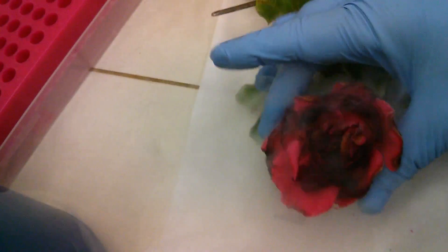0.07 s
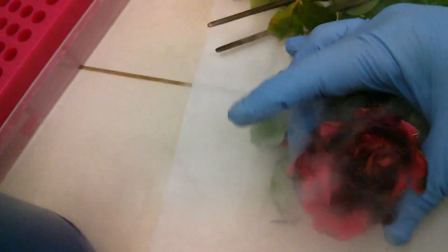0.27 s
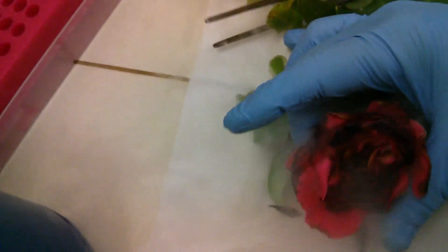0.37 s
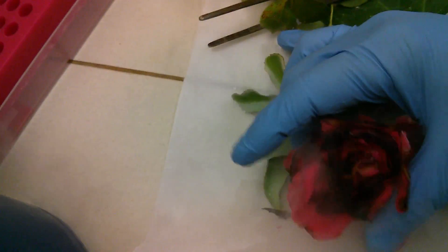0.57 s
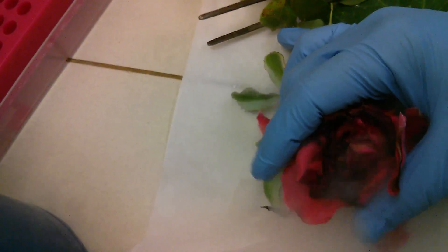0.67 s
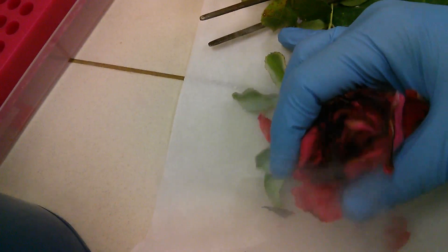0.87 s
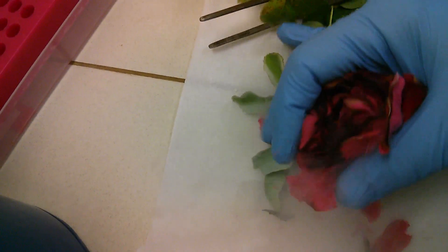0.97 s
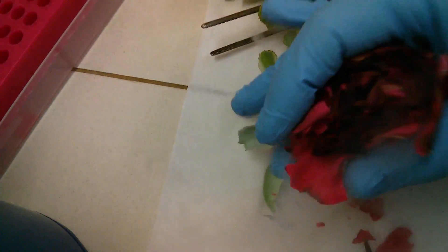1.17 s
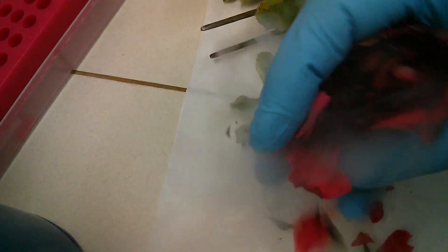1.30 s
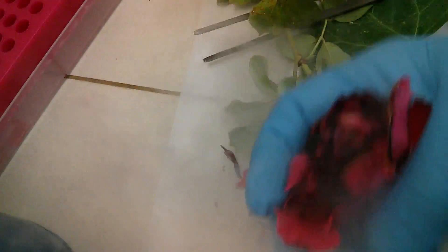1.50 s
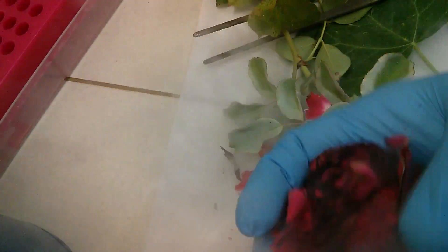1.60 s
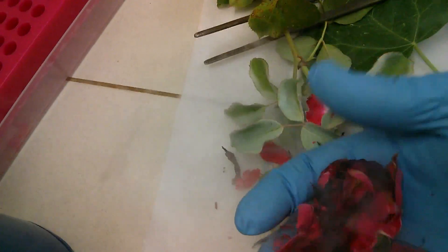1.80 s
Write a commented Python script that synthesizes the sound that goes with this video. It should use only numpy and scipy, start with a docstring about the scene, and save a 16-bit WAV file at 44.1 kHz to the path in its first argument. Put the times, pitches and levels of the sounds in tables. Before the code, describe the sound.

A frozen flower crunches close up, its brittle petals snapping over a faint low rumble.

```python
"""A deep-frozen rose is crushed in a gloved hand, close to the microphone in a small hard room.
Shards crackle and rub as the grip tightens. Petals snap one by one or give way in runs of tiny
fractures, and their thick bases knock as they break. The flower head adds a dull crunch below the
bright ticks; a low room rumble lies underneath."""
import sys
import numpy as np
from scipy import signal
from scipy.fft import rfft, irfft
from scipy.io import wavfile

SR = 44100
rng = np.random.default_rng(int(sys.argv[2]) if len(sys.argv) > 2 else 0)


def digitize_waveform(pressure):
    """Quantize a signal to 16-bit integers and store it at the path in sys.argv[1].

    Rows of a 2-D input are taken as channels; values are limited to [-1, 1].
    """
    field = np.atleast_2d(pressure).T
    bounded = np.clip(field, -1, 1)
    quanta = np.round(bounded * 32767).astype(np.int16)
    wavfile.write(sys.argv[1], SR, quanta)


N = 81585


def undb(db):
    """Decibels to gain."""
    return 10 ** (np.asarray(db) / 20)


def unit(x):
    """Scale to rms 1."""
    return x / np.sqrt(np.mean(x ** 2) + 1e-18)


def fader(rows):
    """Gain riding through (time_s, level_db) points."""
    return undb(np.interp(np.arange(N) / SR, *np.array(rows).T))


def add(out, start_s, x):
    """Mix a short sound in at its time."""
    i = int(start_s * SR)
    out[i:i + len(x)] += x[:max(N - i, 0)]


def band(x, hz, width_hz):
    """One resonance, gain 1 at its centre."""
    return signal.lfilter(*signal.iirpeak(hz, hz / width_hz, fs=SR), x)


def colour(x, points, size=1024):
    """Minimum-phase EQ through (frequency_hz, gain_db) points that keeps the overall level."""
    hz, db = np.array(points).T
    gain = undb(np.interp(np.log(np.fft.rfftfreq(size, 1 / SR) + 1), np.log(hz), db))
    cepstrum = irfft(np.log(gain))[:size // 2]
    cepstrum[1:] *= 2
    response = irfft(np.exp(rfft(cepstrum, size)))
    return unit(signal.fftconvolve(x, response)[:N]) * np.std(x)


def clumps(per_s=300, spread_db=3, decay_s=0.003):
    """One break sets off its neighbours: an envelope that jumps and dies within milliseconds."""
    chance, strength = rng.random((2, N))
    kicks = (chance < per_s / SR) * undb(spread_db * strength) ** 2
    energy = signal.lfilter([1], [1, -np.exp(-2 / (decay_s * SR))], kicks)
    return unit(np.sqrt(energy))


def fractures(per_s, spread_db, shard_hz=9370, spread_oct=0.615, ring_s=0.0003):
    """A stream of tiny breaks of uneven size, each ringing a shard briefly at three pitches."""
    count, k = int(per_s * N / SR), np.arange(128)
    jitter, strength, ring = rng.random((count, 3)).T
    hz = np.clip(shard_hz * 2 ** (spread_oct * rng.standard_normal((count, 3))), 1000, SR / 2)
    tones = np.sin(2 * np.pi * hz[:, :, None] * k / SR).sum(axis=1)
    decay = np.exp(-k / SR / (ring_s * (.5 + ring[:, None])))
    sizes = undb(spread_db * np.minimum(-np.log(1 - strength), 3.2)) * (-1) ** np.arange(count)
    ticks = tones * decay * sizes[:, None]
    starts = ((np.arange(count) + 4 * jitter) / count * N).astype(int) % N
    return unit(np.bincount((starts[:, None] + k).ravel(), ticks.ravel(), N)[:N])


def thuds(per_s, spread_db):
    """Uneven pushes on the flower head, as random impulses."""
    hits = rng.random(N) < per_s / SR
    return unit(hits * rng.choice([-1, 1], N) * undb(spread_db * rng.random(N)))


def crackle():
    """Squeezed shards break in clumps and rub together; the flower head crunches below."""
    # the squeeze of the hand, riding the crackle: time_s, level_db
    squeeze = [(0, -32), (.055, -43.5), (.105, -26.5), (.17, -30), (.275, -32.5), (.32, -21), (.35, -21),
               (.395, -26), (.47, -34), (.515, -28.5), (.615, -31), (.655, -20), (.79, -21), (.92, -21.5),
               (1.01, -20.5), (1.05, -23), (1.15, -24), (1.2, -27.5), (1.228, -20), (1.295, -28),
               (1.37, -15.5), (1.435, -22), (1.56, -20.5), (1.645, -36), (1.68, -27), (1.71, -38),
               (1.745, -39.5), (1.8, -54), (1.85, -46.5)]
    # the dull crunch between snaps, in two bands: time_s, low_level_db, high_level_db
    crunch = [(0, -56, -45), (.07, -67, -56), (.12, -53, -43.5), (.2, -49, -50), (.33, -42, -38.5),
              (.39, -51, -42.5), (.46, -51, -36.5), (.5, -55, -55), (.58, -51, -53), (.68, -42, -40),
              (.81, -45, -36.5), (.97, -45, -35.5), (1.04, -56, -39), (1.19, -66, -49.5), (1.3, -60, -46.5),
              (1.375, -56, -35.5), (1.43, -52, -41), (1.52, -53, -38), (1.58, -65, -45), (1.63, -67, -59),
              (1.68, -63, -55.5), (1.78, -63, -69), (1.85, -73, -63)]
    crunch, flow = np.array(crunch), clumps()
    ticks = undb(-4) * flow * fractures(per_s=3200, spread_db=2.5)
    rub = undb(-7) * fractures(per_s=4000, spread_db=1.2)
    pushes = flow * thuds(per_s=2500, spread_db=4)
    low = fader(crunch[:, [0, 1]]) * undb(-1) * unit(band(pushes, hz=920, width_hz=400))
    high = fader(crunch[:, [0, 2]]) * undb(-4) * unit(band(pushes, hz=2270, width_hz=1810))
    return fader(squeeze) * (ticks + rub), low - high


def rumble():
    """A bed of low room noise that swells here and there in a narrow band."""
    # tone of the room noise: frequency_hz, gain_db
    rumble_colour = [(20, -48), (33, -18), (43, 1.5), (60, -4), (100, -7), (135, -4), (165, 2), (185, -1.5),
                     (210, 4), (250, -3.5), (300, -4), (365, -1.5), (450, -8), (560, -18), (1000, -23.5),
                     (3000, -45.5), (6000, -69), (16000, -73)]
    # brief swells of the rumble: middle_s, length_s, pitch_hz, level_db
    swells = [(0.407, 0.064, 202, -39.5), (0.537, 0.058, 226, -40), (0.725, 0.03, 130, -47),
              (0.85, 0.11, 71.6, -53), (0.992, 0.11, 284, -42), (1.026, 0.11, 350, -40.5),
              (1.114, 0.057, 130, -43.5), (1.114, 0.048, 45.5, -43), (1.213, 0.078, 197, -42),
              (1.284, 0.027, 192, -45), (1.468, 0.032, 191, -38.5), (1.542, 0.036, 49, -51),
              (1.7, 0.078, 217, -43.5), (1.842, 0.055, 193, -38)]
    t = np.arange(N) / SR
    out = undb(-42) * colour(rng.standard_normal(N), rumble_colour, size=16384)
    for middle, length, hz, db in swells:
        shape = np.exp(-2 * ((t - middle) / length) ** 2)
        drone = band(band(rng.standard_normal(N), hz, 0.27 * hz), hz, 0.28 * hz)
        out += undb(db) * unit(shape * drone) * np.sqrt(np.mean(shape ** 2))
    return out


def snaps(attack_s=0.00005, crack_decay_s=0.0011, rustle_decay_s=0.0031, jolt_decay_s=0.0031):
    """A crack runs through a petal, rings it, rustles its neighbours and jolts the flower head."""
    # single petals snapping: start_s, level_db, crunch_level_db, pitch_hz
    petal_snaps = [(0.0629, -22, -63, 10800), (0.0749, -21.5, -66, 10700), (0.0952, -15, -34.5, 9800),
                   (0.1164, -17, -37.5, 8550), (0.186, -16, -32, 8600), (0.1885, -19, -36, 8000),
                   (0.2182, -21, -32.5, 10600), (0.236, -8.5, -23, 8900), (0.2778, -19, -49, 7800),
                   (0.2884, -11.5, -55, 10100), (0.2996, -11.5, -22, 6750), (0.304, -15, -33.5, 9300),
                   (0.3247, -16, -26, 6260), (0.333, -37, -55, 9600), (0.3551, -15, -26.5, 9100),
                   (0.3956, -18, -33, 7000), (0.4091, -8.5, -41, 8700), (0.4118, -13, -30.5, 12500),
                   (0.4221, -16, -51, 7350), (0.4419, -9.5, -38, 10000), (0.4502, -10, -34, 9900),
                   (0.455, -4.5, -19, 9300), (0.4708, -25, -39, 8700), (0.5405, -10, -29.5, 9700),
                   (0.5463, -10.5, -35, 10400), (0.6087, -15, -34.5, 9500), (0.6282, -7.5, -39, 9000),
                   (0.6328, -6.5, -30, 8500), (0.6406, -19, -40, 8700), (0.6601, -12, -32, 8700),
                   (0.6755, -17, -33, 8500), (0.6876, -11, -27.5, 8400), (0.7116, -19, -29, 6600),
                   (0.7256, -14.5, -25, 8800), (0.7361, -3.5, -40, 9200), (0.7539, -11, -48, 8900),
                   (0.7758, -14, -45, 8700), (0.8041, -11, -32, 7700), (0.8159, -11, -24.5, 8640),
                   (0.8216, -9, -44, 10200), (0.8415, -10.5, -44, 8700), (0.855, -17, -39, 9500),
                   (0.874, -10, -26, 8800), (0.8781, -13.5, -34, 8850), (0.8979, -13, -23, 8900),
                   (0.9053, -8.5, -48, 7150), (0.9176, -11.5, -28, 9500), (0.9221, -11, -44, 9400),
                   (0.954, -8, -20.5, 9400), (0.9625, -9, -56, 8650), (0.9772, -10, -45, 8100),
                   (1.0019, -12, -39, 10200), (1.0863, -16.5, -30.5, 5850), (1.127, -13, -33, 8300),
                   (1.1508, -17, -35, 8200), (1.2589, -27, -42, 9200), (1.3176, -19, -40, 8000),
                   (1.3245, -14, -46, 7900), (1.407, -8, -41, 8340), (1.4653, -7.5, -27, 10900),
                   (1.7247, -24.5, -62, 9800), (1.7553, -31.5, -66, 6550), (1.7795, -35.5, -73, 10200)]
    size = 1536
    bright, dull, t = np.zeros(N), np.zeros(N), np.arange(size) / SR
    attack = 1 - np.exp(-t / attack_s)
    decay = np.exp(-t / crack_decay_s) + undb(-3.5) * np.exp(-t / rustle_decay_s)
    for start, db, crunch_db, hz in petal_snaps:
        crack_noise, jolt_noise = np.sign(rng.standard_normal((2, size)))
        crack = crack_noise * attack * decay
        petal = band(crack, hz, width_hz=4500) + 0.21 * crack
        jolt = jolt_noise * np.exp(-t / jolt_decay_s)
        # the first few milliseconds set each hit's level
        add(bright, start, petal / np.std(petal[:size // 21]) * undb(db - 2))
        add(dull, start, jolt / np.std(jolt[:size // 9]) * undb(crunch_db - 1))
    return bright, dull


def knocks(push_decay_s=0.0017):
    """A thick petal base breaks with a short rough push and rings at one pitch."""
    # petal bases breaking: start_s, pitch_hz, peak_db, ring_t60_s
    base_breaks = [(.218, 1790, -25.5, 0.0075), (.326, 4140, -12.5, 0.032), (.335, 1020, -28, 0.0076),
                   (.411, 2240, -29, .1), (.454, 2390, -27, .06), (.456, 800, -29, .005),
                   (.598, 4605, -20.5, .02), (.609, 4270, -31, 0.014), (.633, 4570, -20, 0.018),
                   (.736, 657, -32, 0.021), (.738, 1240, -24.5, 0.012), (.804, 1850, -20, 0.011),
                   (1.086, 5550, -19, 0.017), (1.226, 1930, -26.5, 0.011), (1.4655, 735, -29, 0.0038),
                   (1.724, 5360, -29, 0.029)]
    out, t = np.zeros(N), np.arange(N // 12) / SR
    for start, hz, db, t60 in base_breaks:
        push = rng.standard_normal(len(t)) * np.exp(-t / push_decay_s)
        ring = band(push, hz, width_hz=np.log(1000) / np.pi / t60)
        add(out, start, undb(db) * ring / np.abs(ring).max())
    return out


def collapses(attack_s=0.00093, release_s=0.0021):
    """Petals give way in sudden, short runs of dense fractures over a dull crunch."""
    # layers of petals giving way: start_s, length_s, level_db
    runs = [(0.318, 0.015, -14.5), (0.417, 0.02, -20), (0.46, 0.014, -18.5), (0.746, 0.0091, -19),
            (0.8, 0.023, -20.5), (0.847, 0.0094, -15), (0.892, 0.022, -21.5), (0.957, 0.0244, -14.5),
            (1.314, 0.014, -18.5), (1.347, 0.027, -21.5), (1.366, 0.029, -17.5)]
    flow, t = np.zeros(N), np.arange(N // 10) / SR
    attack = 1 - np.exp(-t / attack_s)
    for start, length, db in runs:
        release = np.exp(-np.maximum(t - length, 0) / release_s)
        add(flow, start, undb(db) * attack * release)
    bright = flow * undb(0.5) * fractures(per_s=2600, spread_db=6)
    dull = flow * undb(-18.5) * thuds(per_s=3600, spread_db=14)
    return bright, dull


def reflections(x, t60_s, delay_s, crossfade_s=0.06, patterns=16):
    """Reflections die away; one pattern crossfades into the next, keeping them smooth and unpitched."""
    out, t = np.zeros(N), np.arange(N // 4) / SR
    place = np.arange(N) / SR / crossfade_s
    for k in range(patterns):
        response = rng.standard_normal(len(t)) * np.exp(-np.log(1000) * t / t60_s) * (t > delay_s)
        away = np.abs((place - k + patterns / 2) % patterns - patterns / 2)
        crossfade = np.cos(np.pi / 2 * np.minimum(away, 1))
        out += signal.fftconvolve(x * crossfade, response / np.linalg.norm(response))[:N]
    return out


def scene():
    """The rose cupped in the hand, near reflections, the room's tail and its rumble, in mono."""
    # bright tone of the shards: frequency_hz, gain_db
    shard_colour = [(500, -68), (2000, -14), (3100, -10), (4100, -6), (5300, -1), (6800, -2.5), (8500, 2),
                    (11000, -1), (13500, -1), (16000, -4.5)]
    # dull tone of the flower head: frequency_hz, gain_db
    head_colour = [(200, -31), (500, -5.5), (750, -6.5), (1100, -3.5), (1600, 0), (2200, 1.5), (2800, 0),
                   (3600, 3.5), (5000, 5), (9000, -39)]
    # resonances of the flower cupped in the hand: pitch_hz, width_hz, gain_db
    cup_modes = [(1620, 20, -4), (1677, 58, -10.5), (1922, 42, 0), (2265, 20, 2.5), (3380, 76, -0.5),
                 (4032, 164, -1), (4457, 270, -9), (5170, 110, -4)]
    bright, dull = np.sum([snaps(), collapses(), crackle()], axis=0)
    breaking = colour(bright, shard_colour) + colour(dull, head_colour)
    cup = sum(undb(db) * band(breaking, hz, width) for hz, width, db in cup_modes)
    rose = breaking + cup + knocks()
    early = undb(-8) * reflections(rose, t60_s=0.05, delay_s=0.0008)
    tail = undb(-10.5) * reflections(rose, t60_s=0.4, delay_s=0.0047)
    return (rose + early + tail + rumble())[None]


def record(dry):
    """The housing notches the upper mids; the recorder rounds the sharpest peaks and cuts the top."""
    # notches of the microphone housing: frequency_hz, width_hz, depth (0-1)
    housing_dips = [(2475, 83, 1), (2834, 108, 1), (3154, 160, 0.8), (3470, 124, .85), (3874, 143, 0.5),
                    (4146, 99, 0.94)]
    ceiling, top_hz = 0.68, 15900
    for hz, width, depth in housing_dips:
        dry = dry - depth * band(dry, hz, width)
    rounded = ceiling * np.tanh(dry / ceiling)
    return signal.sosfilt(signal.ellip(10, .2, 80, top_hz, fs=SR, output="sos"), rounded)


dry = scene()
out = record(dry)
digitize_waveform(out)
```